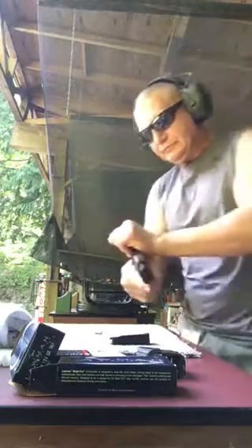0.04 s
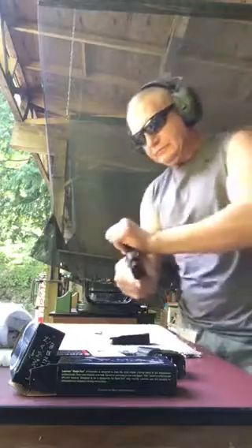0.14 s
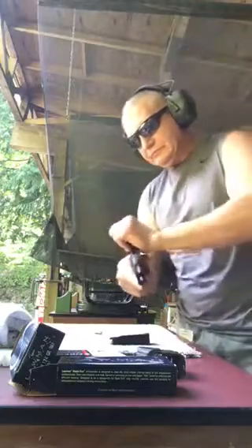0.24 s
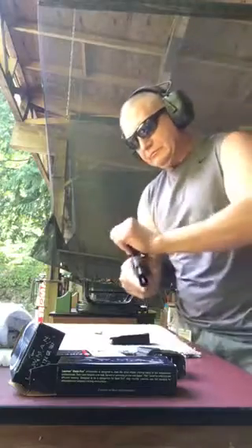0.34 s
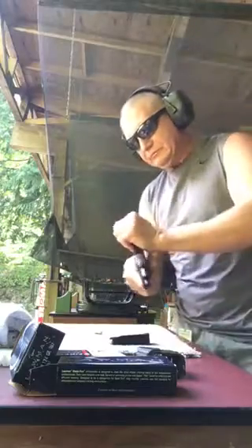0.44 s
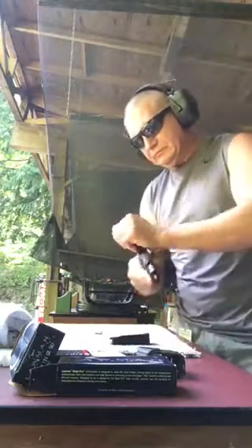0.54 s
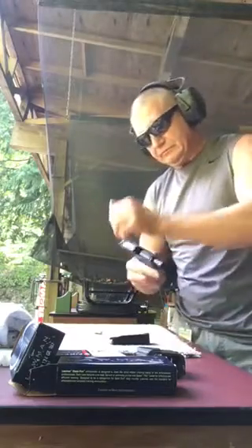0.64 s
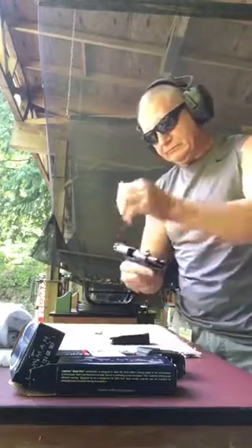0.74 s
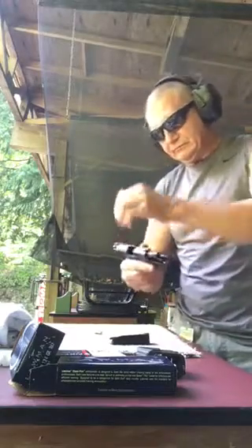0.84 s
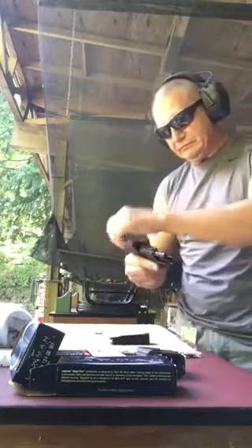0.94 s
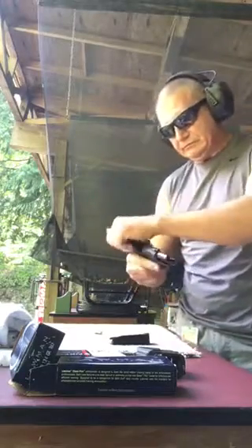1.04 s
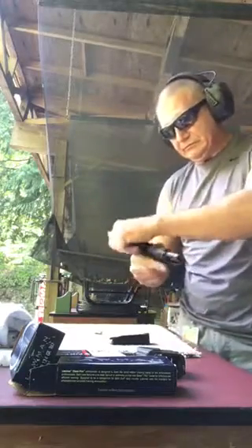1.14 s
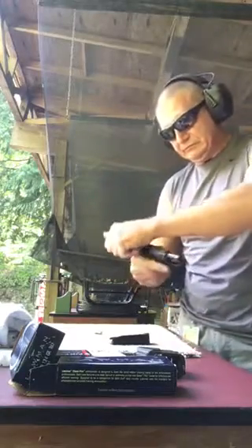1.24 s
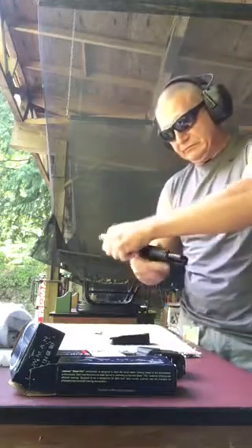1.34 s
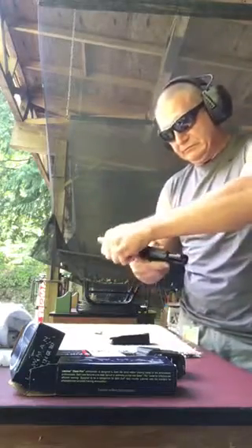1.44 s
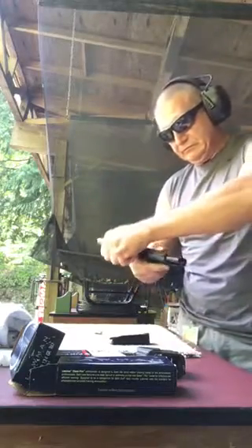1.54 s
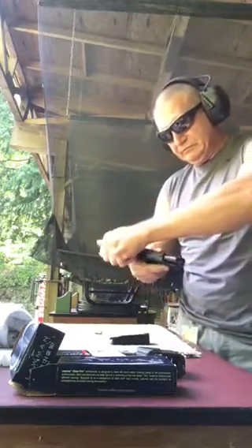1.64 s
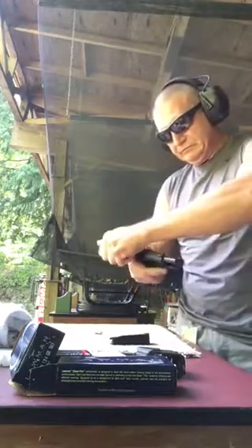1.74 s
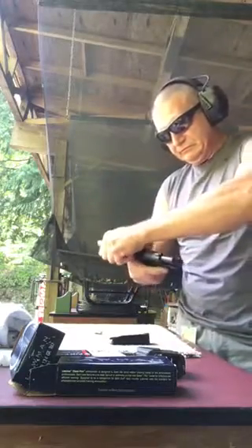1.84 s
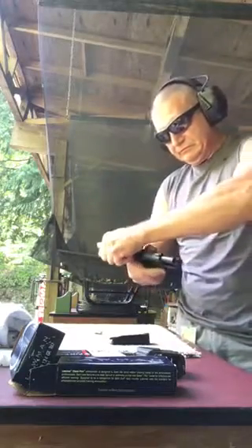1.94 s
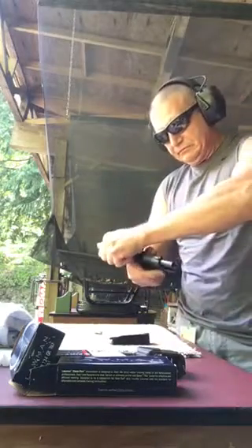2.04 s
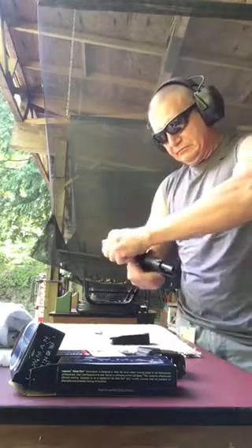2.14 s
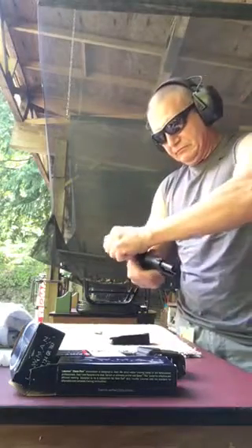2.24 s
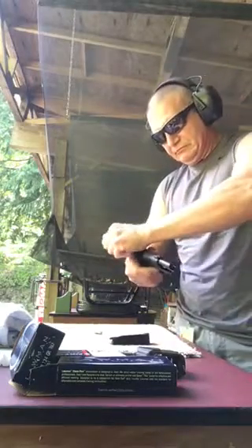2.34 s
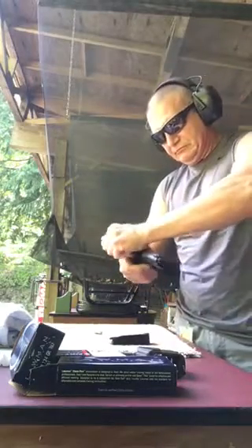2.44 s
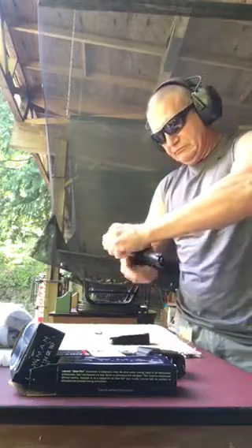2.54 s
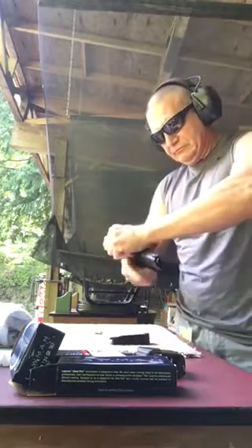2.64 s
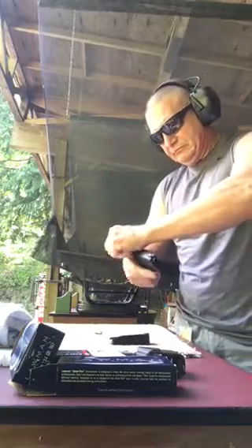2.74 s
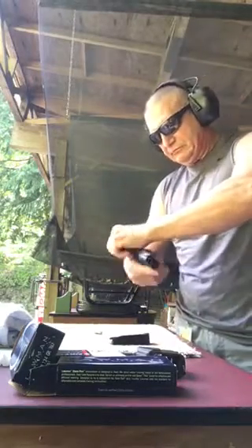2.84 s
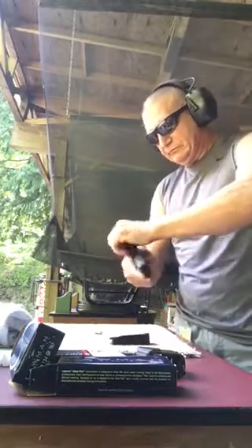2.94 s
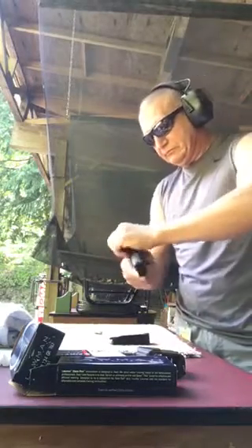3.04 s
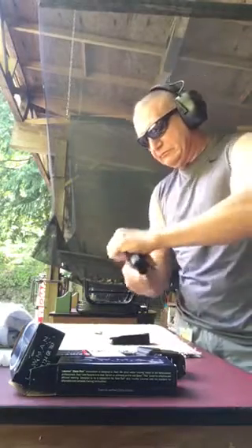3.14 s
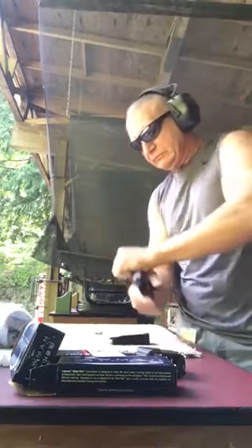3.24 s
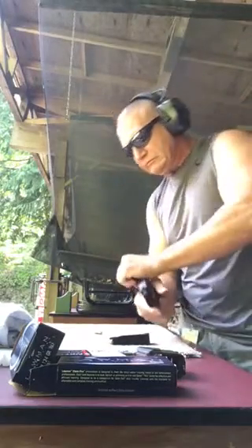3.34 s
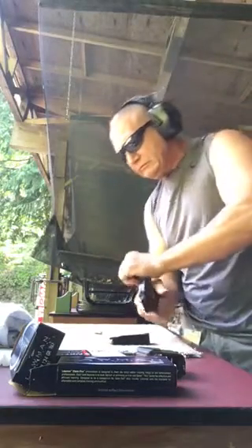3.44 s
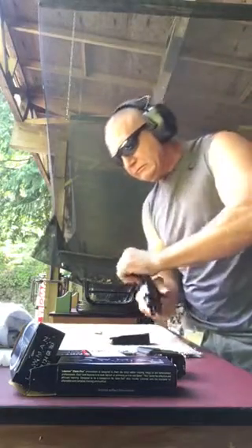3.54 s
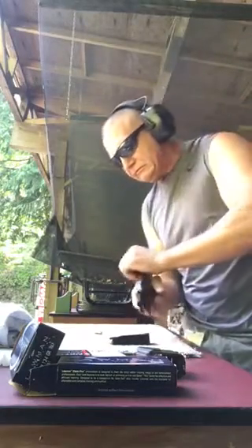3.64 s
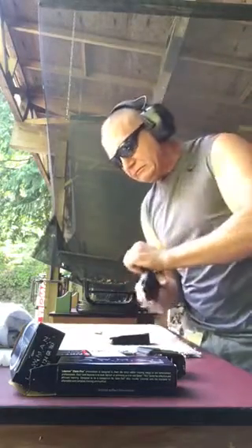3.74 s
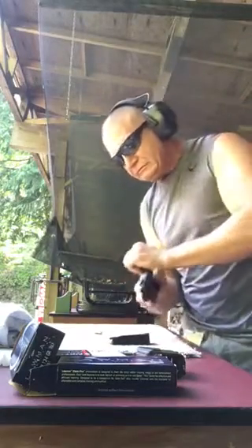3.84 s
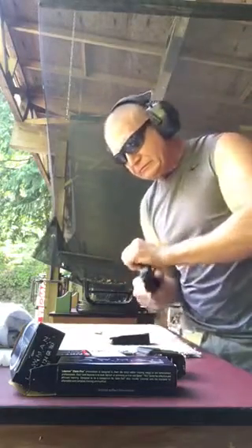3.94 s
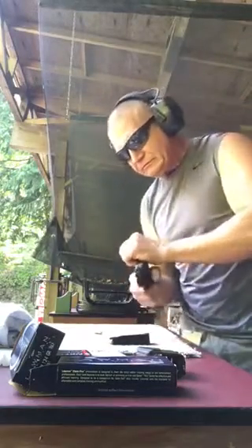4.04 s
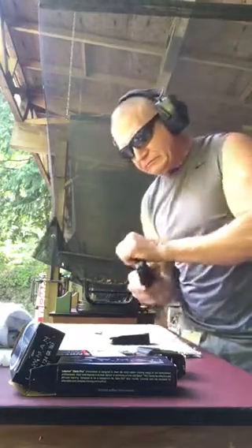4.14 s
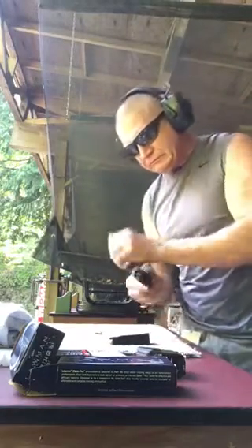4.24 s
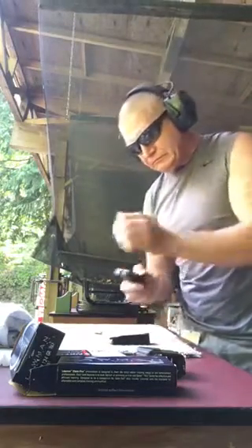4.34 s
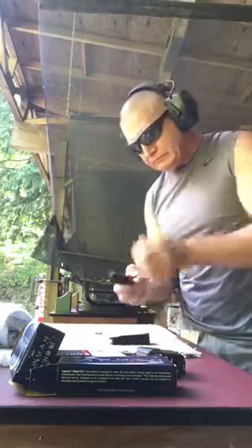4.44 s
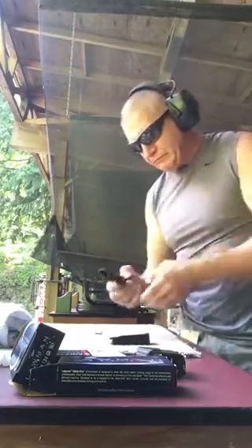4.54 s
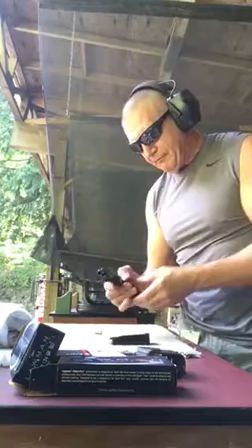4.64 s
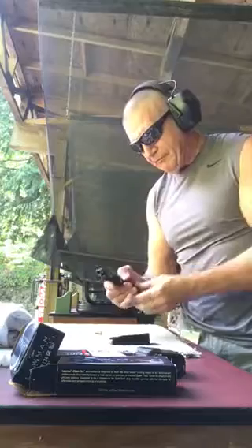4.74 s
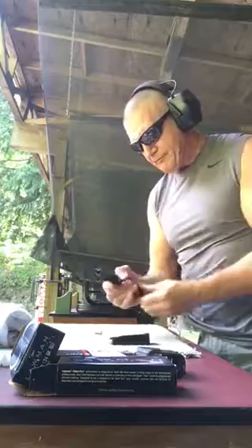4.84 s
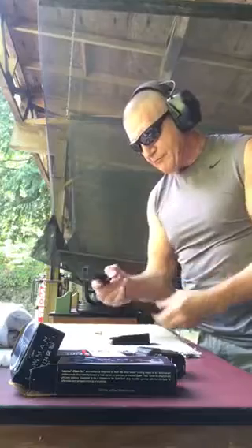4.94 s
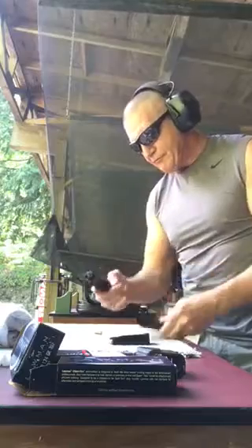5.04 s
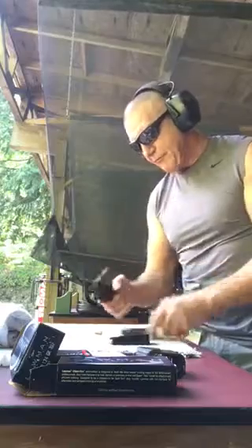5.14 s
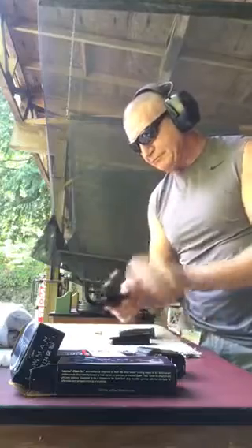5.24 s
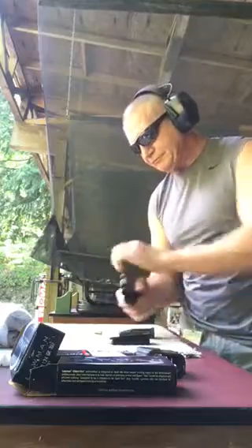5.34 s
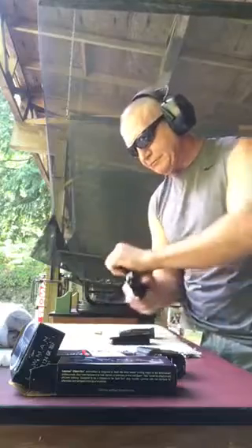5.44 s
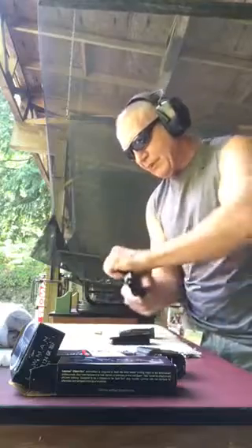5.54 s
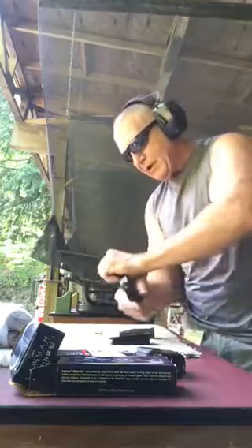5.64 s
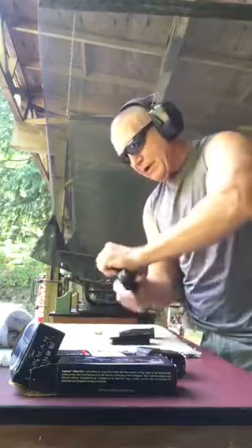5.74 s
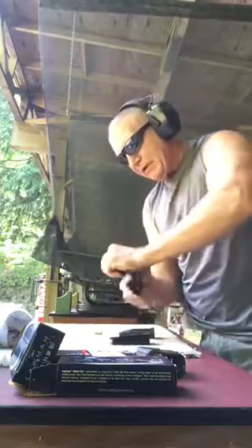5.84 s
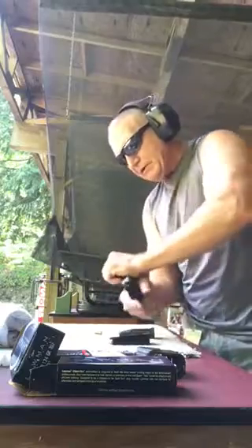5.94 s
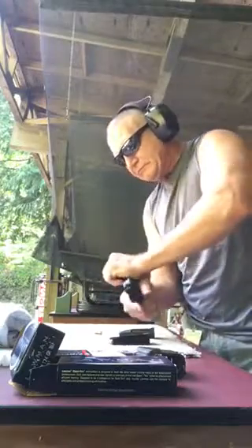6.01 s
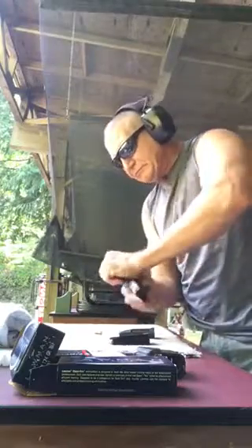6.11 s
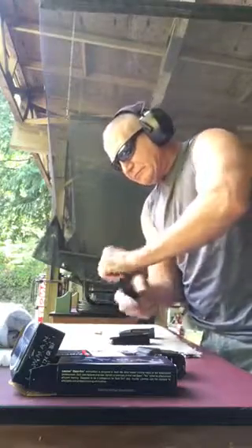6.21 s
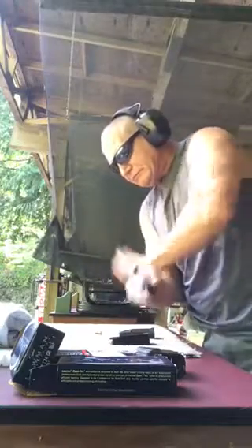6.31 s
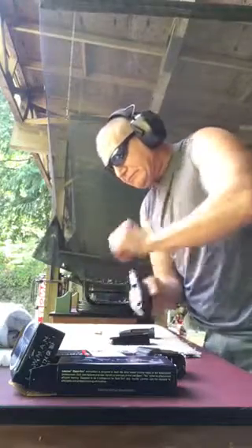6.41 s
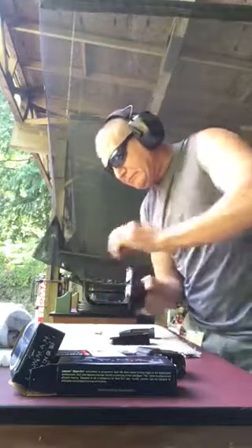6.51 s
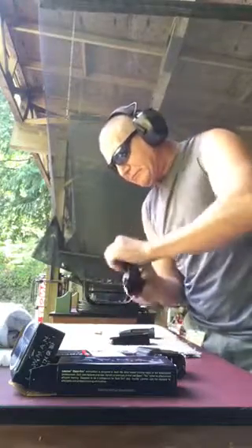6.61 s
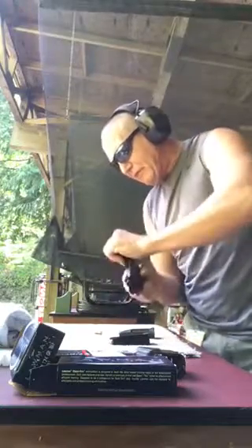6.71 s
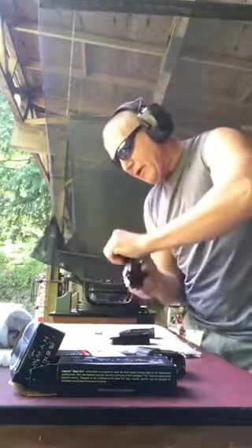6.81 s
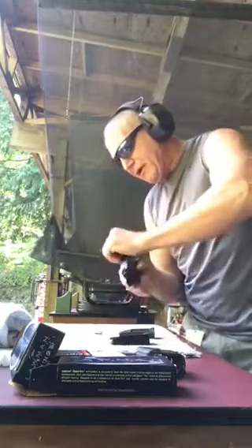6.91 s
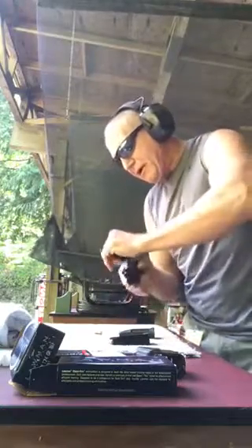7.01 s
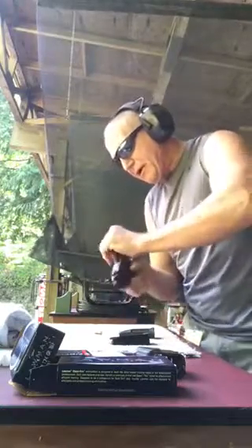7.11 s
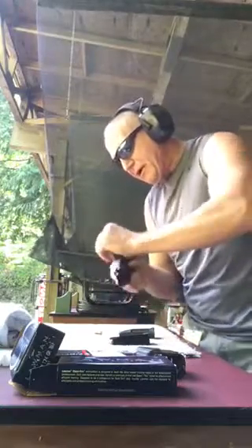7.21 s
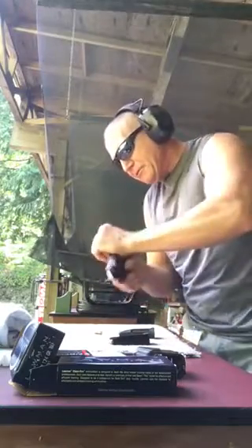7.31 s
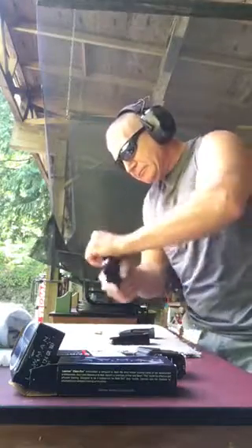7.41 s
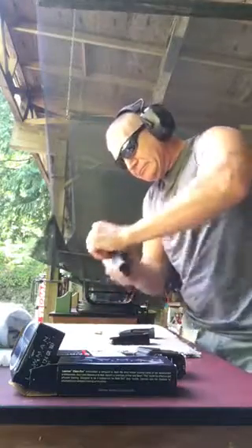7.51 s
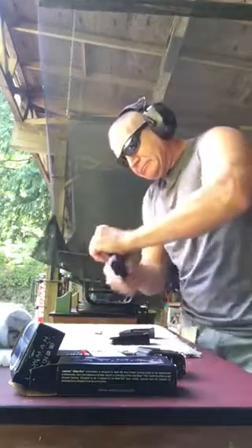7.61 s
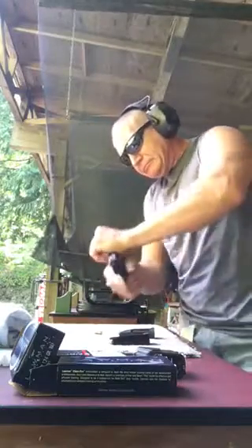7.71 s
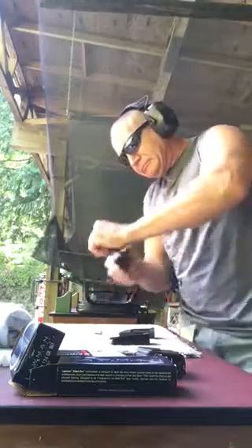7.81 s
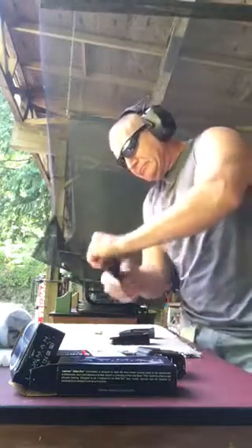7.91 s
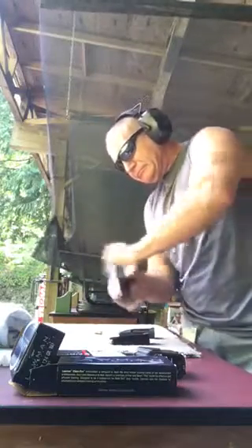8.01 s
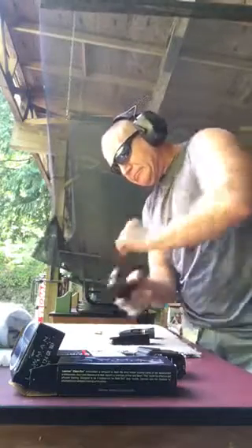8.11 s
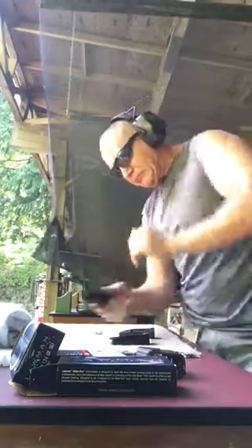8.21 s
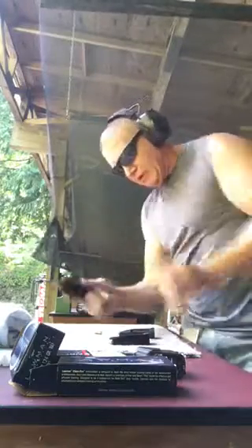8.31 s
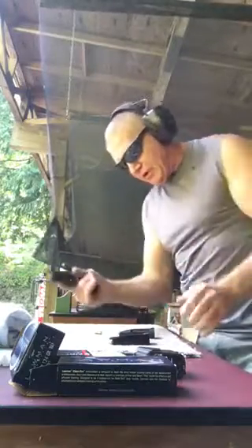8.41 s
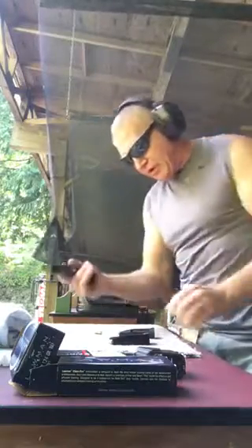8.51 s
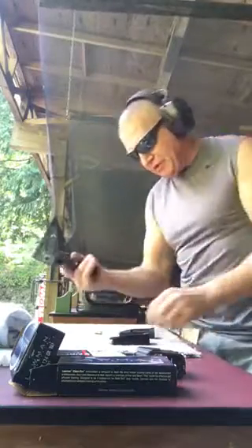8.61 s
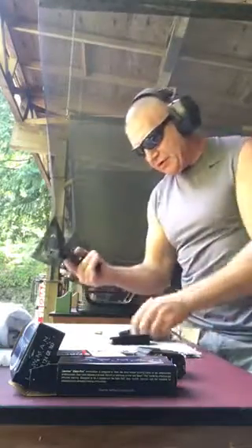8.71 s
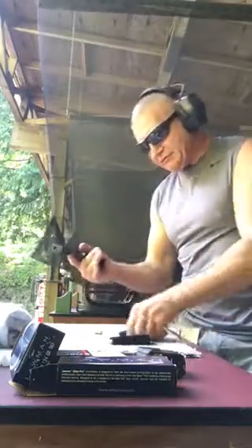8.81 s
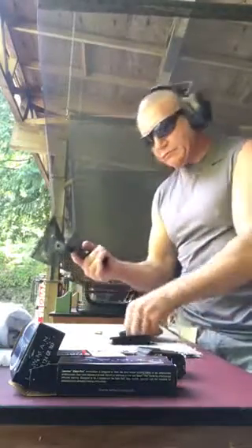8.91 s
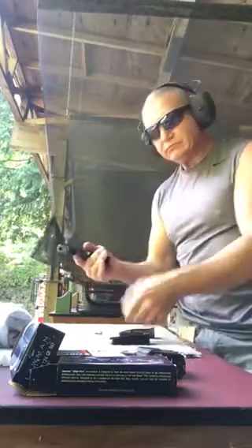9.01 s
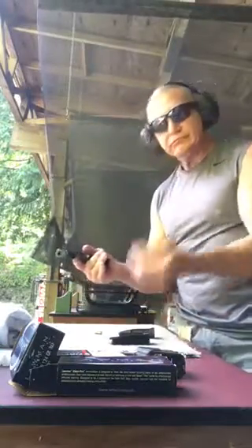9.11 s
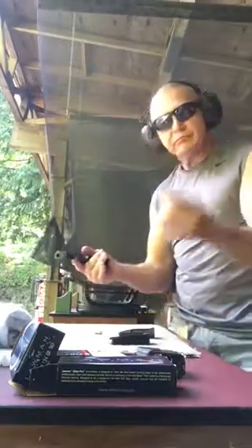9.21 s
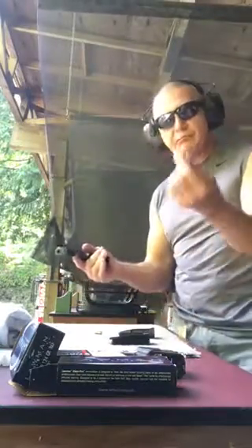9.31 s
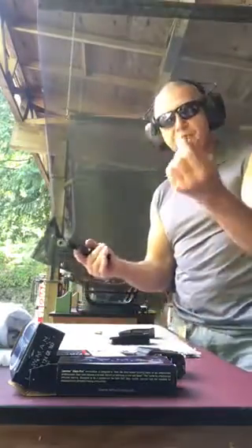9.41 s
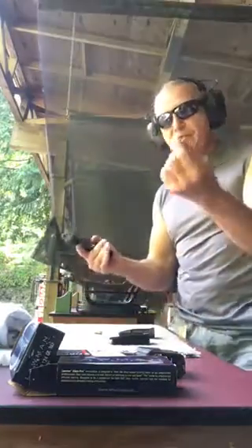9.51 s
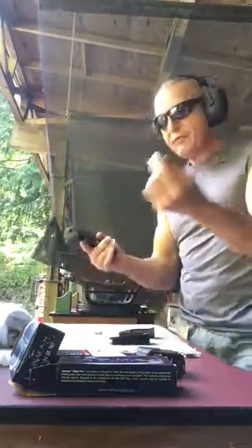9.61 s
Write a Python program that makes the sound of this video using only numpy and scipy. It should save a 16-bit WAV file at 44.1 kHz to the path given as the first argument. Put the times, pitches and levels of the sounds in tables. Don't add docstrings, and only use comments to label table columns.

```python
import sys
import numpy as np
from scipy import signal
from scipy.fft import rfft, irfft, next_fast_len
from scipy.io import wavfile
from scipy.ndimage import uniform_filter1d, map_coordinates

SR = 44100
rng = np.random.default_rng(int(sys.argv[2]) if len(sys.argv) > 2 else 0)


def volts(x):
    e = np.asarray(x, float) / 20
    return 10 ** e


def wav_record(signal):
    frames = np.transpose(np.atleast_2d(signal))
    bounded = np.clip(frames, -1, 1)
    quanta = np.round(bounded * 32767).astype(np.int16)
    wavfile.write(sys.argv[1], SR, quanta)


N = 426006


def unit(x):
    return x / np.sqrt(np.mean(x ** 2) + 1e-20)


def along(points, hz):
    f, v = np.transpose(points)
    return np.interp(np.log(hz + 1), np.log(f + 1), v)


def wobble(rate):
    knots = rng.standard_normal(int(N * rate / SR) + 4)
    return map_coordinates(knots, [np.arange(N) * rate / SR])


def coloured(x, spectrum):
    m = next_fast_len(len(x))
    gain = volts(along(spectrum, np.fft.rfftfreq(m, 1 / SR)))
    return unit(irfft(rfft(x, m) * gain, m)[:len(x)])


def dying(length, t60s, nper=256):
    hz, t, z = signal.stft(rng.standard_normal(length), SR, nperseg=nper)
    decay = volts(-60 * t / along(t60s, hz)[:, None])
    return signal.istft(z * decay, SR, nperseg=nper)[1][:length]


def add(track, s, x):
    part = track[max(round(s * SR), 0):][:len(x)]
    part += x[:len(part)]


def rough_tone(hz, width_hz, count):
    knots = rng.standard_normal((2, int(count * width_hz / SR) + 4))
    a, b = (map_coordinates(k, [np.arange(count) * width_hz / SR]) for k in knots)
    phase = 2 * np.pi * np.cumsum(np.broadcast_to(hz, count)) / SR
    return a * np.sin(phase) + b * np.cos(phase)


def ring(hz, width_hz, t60, wander):
    t = np.arange(round(min(t60, 1 / 3) * SR)) / SR
    blur_hz = 11 / t60 / (1.5 - wander)
    rough = rough_tone(hz, min(width_hz, blur_hz), len(t))
    steady = np.sqrt(abs(1 - wander ** 2)) * np.sin(2 * np.pi * hz * t)
    return (steady + wander * rough) * volts(-60 * t / t60)


# (frequency [Hz], t60 [s])
SHELTER_T60 = [(300, 0.32), (1500, 0.24), (5000, 0.23), (15000, 0.18)]


def tail():
    x = dying(SR // 5, SHELTER_T60)
    t = np.arange(len(x)) / SR
    roof_swell = 1 + 0.7 * np.exp(-((t - .0145) / 0.0018) ** 2)
    x *= np.clip(t / 0.0036, 0, 1) * roof_swell
    return x / np.linalg.norm(x)


def shelter(x, wet_db):
    wet = signal.fftconvolve(x, volts(wet_db) * tail())
    wet[:len(x)] += x
    return wet


# (time [s], level [dB])
PHONE_GAIN = [(0, 0.5), (1.4, -0.5), (3.3, -1.5), (4.4, 3), (5.4, 3.5), (6.1, -2), (6.8, 1), (7.35, -1),
              (7.7, -10), (8.4, -12), (8.65, -1), (9.2, 1.5), (9.66, -1)]


def phone_gain_db():
    s, db = np.transpose(PHONE_GAIN)
    return np.interp(np.arange(N) / SR, s, db, left=-120, right=-120)


# (frequency [Hz], level [dB per Hz])
RUMBLE_SPECTRUM = [(12, -39), (20, -17), (64, 3), (118, -3.5), (193, -9), (247, -7.5), (300, -20),
                   (390, -48.5), (660, -120)]


def rumble():
    level_db = -61.5 + phone_gain_db() + 0.89 * wobble(3.6)
    return volts(level_db) * coloured(rng.standard_normal(N), RUMBLE_SPECTRUM)


# (frequency [Hz], level [dB per Hz])
LEAF_SPECTRUM = [(170, -25), (300, -1.5), (600, -4), (900, -9), (1500, -13.5), (2600, -27.5)]


def leaves():
    level_db = -68.5 + 0.22 * phone_gain_db() + 1.7 * wobble(4.7)
    return volts(level_db) * coloured(rng.standard_normal(N), LEAF_SPECTRUM)


# (frequency [Hz], level [dB per Hz])
MIC_SPECTRUM = [(900, -26), (1800, -2.5), (3200, 1.5), (4900, -7), (6500, -3.5), (10400, -13.5),
                (13000, -11), (16500, -25)]


def microphone_hiss():
    return volts(-73.5 + 1.3 * wobble(9.6)) * coloured(rng.standard_normal(N), MIC_SPECTRUM)


def machine():
    shaft_hz, load_off_s = 40.7, 3.3
    t = np.arange(N) / SR
    duck_db = 1.8 * np.minimum(phone_gain_db(), 0)
    third_db = -56.5 - 1.17 * t - 2.5 * (t > load_off_s) + duck_db
    sixth_db = np.where(t < load_off_s, -66.5, -77) + duck_db
    turns = np.cumsum(shaft_hz * (1 + .008 * wobble(1.5))) / SR
    orders = [(2.1, third_db - 6), (3, third_db + 1.5), (4.1, third_db - 8.5), (5.95, sixth_db + 3)]
    return sum(volts(db + 2.2 * wobble(4.5)) * np.sin(2 * np.pi * k * turns) for k, db in orders)


# (middle [s], length [s], rustle [dB], hollow [dB])
RUBS = [(.0, 0.13, -62, -67), (0.104, 0.15, -64, -56.5), (0.495, 0.11, -70.5, -76),
        (0.662, 0.087, -68, -70.5), (0.736, 0.11, -64, -61), (0.82, 0.13, -70.5, -73),
        (1.013, .1, -68, -86), (1.147, 0.069, -59, -72), (1.308, 0.07, -69, -69), (1.366, 0.16, -74, -85),
        (4.23, 0.12, -61.5, -73), (4.315, 0.036, -66, -82), (4.515, 0.1, -66.5, -62),
        (4.703, 0.064, -69, -66.5), (4.777, 0.0697, -69, -74), (4.946, 0.17, -53.5, -52),
        (4.978, 0.05, -53, -45), (5.065, 0.19, -65.5, -61), (5.223, 0.1, -67, -64),
        (5.532, 0.033, -68, -70), (6.294, 0.086, -30.5, -39.5)]
# (frequency [Hz], level [dB per Hz])
SKIN_SPECTRUM = [(1290, -23.5), (2200, -9.5), (3240, -2), (11900, -10.5), (14800, -16.5), (16100, -26.5),
                 (16500, -47.5)]
# (frequency [Hz], level [dB per Hz])
GRIP_SPECTRUM = [(900, -46.5), (1400, -11.5), (1800, 1), (2200, -10), (2900, -36)]


def hands():
    t, grain = np.arange(N) / SR, volts(3.9 * wobble(140))
    rustle = coloured(rng.standard_normal(N) * grain, SKIN_SPECTRUM)
    hollow = coloured(rng.standard_normal(N) * grain, GRIP_SPECTRUM)
    out = np.zeros(N)
    for s, length, rustle_db, hollow_db in RUBS:
        swell = np.cos(np.pi * np.clip((t - s) / length, -.5, .5)) ** 2
        out += swell * (volts(rustle_db) * rustle + volts(hollow_db) * hollow)
    return out


def strike_rise(t):
    return 1 - np.exp(-t / 0.00011)


# (time [s], level [dB], frequency [Hz])
PALM_KNOCKS = [(0.058, -48, 610), (0.0891, -38.5, 910), (0.205, -26.5, 800), (.261, -35.5, 560),
               (.29, -41, 300), (2.4645, -23.5, 770), (2.655, -48, 720), (2.945, -49.5, 894),
               (3.279, -25, 776), (3.283, -32, 563), (5.667, -31, 390), (6.009, -30.5, 380),
               (6.16, -33, 349.5), (6.271, -38.5, 350), (6.327, -24, 362), (7.435, -36.5, 361),
               (7.557, -24, 520), (7.83, -28, 400), (8.068, -34.5, 400), (8.073, -23, 299.6),
               (8.077, -22.5, 548), (8.085, -8.5, 660)]


def knocks():
    out, t = np.zeros(N), np.arange(SR // 25) / SR
    for s, db, hz in PALM_KNOCKS:
        body = np.sin(2 * np.pi * hz * t) + 0.49 * rough_tone(hz * 1.2, 300, len(t))
        knock = volts(db - 60 * t / 0.021) * strike_rise(t) * body
        high_pass = signal.butter(2, 0.6 * hz, "high", fs=SR)
        add(out, s, signal.lfilter(*high_pass, knock))
    return out


# (time [s], peak level [dB], frequency [Hz])
TAPS = [(0.081, -36.5, 1370), (0.6536, -52, 3320), (0.717, -43, 1780), (0.955, -44, 3300),
        (0.9612, -41, 4570), (1.0612, -42, 4300), (8.908, -62, 4505), (1.1477, -49, 7030),
        (1.81, -53, 3300), (1.812, -59, 8000), (1.307, -53, 1750), (1.309, -56, 3300), (1.31, -58, 6100),
        (2.599, -49, 1730), (2.837, -40, 1150), (2.9455, -50, 2050), (3.162, -57.5, 1730),
        (3.2273, -42, 3300), (5.2305, -44.5, 2900), (5.545, -53.5, 1430), (5.5918, -55, 1730),
        (5.6079, -37, 1550), (5.6156, -37, 4260), (6.763, -50, 2840), (6.8395, -52, 3180),
        (6.844, -53.5, 7800), (7.02, -47, 3650), (7.1388, -59, 1706), (7.1834, -55, 1460),
        (7.2112, -42, 3560), (7.396, -39, 1324), (8.8784, -52, 3170)]


def ticks():
    out, t = np.zeros(N), np.arange(SR // 25) / SR
    for s, db, hz in TAPS:
        t60_ms = 18 * (1000 / hz) ** 0.29
        tone = strike_rise(t) * volts(-60 * t * 1000 / t60_ms) * np.sin(2 * np.pi * hz * t)
        tip_spectrum = [(hz / 2.0, -20), (hz, 0), (hz * 2.2, -14), (hz * 6, -32)]
        tip = 0.29 * volts(-60 * t / 0.0067) * coloured(rng.standard_normal(len(t)), tip_spectrum)
        add(out, s, volts(db + 0.8) * shelter(tone + tip, wet_db=-13.5))
    return out


# (time [s], peak level [dB], frame ring [Hz], ring [dB], brightness [dB])
SLIDE_STOPS = [(0.2045, -19, 1640, -8, -8.5), (0.2066, -18, 1500, -8, -8.5),
               (2.4649, -12.5, 1036, -12, -10), (3.279, -3, 1606, -11, -5.5), (3.4961, -6, 1192, -9, -6),
               (5.6422, -12.5, 1710, -7.5, 1), (5.6672, -14, 1550, -7, -10.5),
               (5.8285, -10.5, 1160, -15, -8.5), (5.8352, -6, 1136, -8, 0.5), (6.011, -4.5, 1396, -8, -7),
               (6.1526, -8, 1206, -16, -6), (6.1576, -7, 1190, -7.5, -0.5), (6.2719, -3.5, 1410, -4, -5),
               (6.3271, -5, 1344, -5, -5.5), (7.4365, -2, 1284, -14.5, -5.5), (7.5562, -3, 1700, -16, -3),
               (7.56, -3, 1600, -16, -3), (7.7228, -3.5, 1780, -13, -5.5), (7.8262, -2.5, 1625, -17, -2.5),
               (7.8305, -4.5, 1480, -14.5, -4), (7.9813, -2.5, 1430, -11.5, -5.5),
               (8.084, -1, 1160, -20, -3)]
# (time [s], peak level [dB], frame ring [Hz], ring [dB])
CATCH_TOUCHES = [(5.6609, -17.5, 1568, -11), (5.671, -18.5, 1756, -18), (5.807, -33, 1460, -20),
                 (5.8231, -22.5, 1212, -10), (5.966, -17, 1433, -11), (5.9704, -22.5, 1800, -6),
                 (6.148, -26, 1400, 2.5), (6.2408, -15.5, 1362, -9), (7.4068, -23.5, 1350, -18.5),
                 (7.4164, -15, 1357, -16), (7.4896, -18.5, 1384, -5), (7.4968, -20.5, 1473, -16.5),
                 (7.5138, -17.5, 1576, -12), (7.5515, -16, 1450, -11.5), (7.774, -23.5, 1400, -14.5),
                 (8.043, -26, 1503, -20), (7.5239, -14, 1313, -12.5), (7.6898, -19.5, 1334, -8.5),
                 (7.697, -17, 1350, -13), (7.8215, -15.5, 1137, -15), (7.9472, -17, 1695, -21),
                 (7.9545, -16.5, 1710, -14)]
# (time [s],
# peak level [dB], ring [dB])
LOOSE_RATTLES = [(0.2186, -22, -21), (0.2224, -21, -25), (0.9624, -36, -9), (2.471, -20, -15),
                 (2.483, -19.5, -38), (2.4888, -20.5, -11), (2.513, -23.5, -7), (2.52, -20.5, -29),
                 (2.6554, -30, -40), (2.8172, -30.5, -27), (2.8437, -27.5, -24.5), (3.2356, -20.5, -15),
                 (3.312, -19.5, -21.5), (4.9995, -32, -23), (5.2309, -42.5, -15), (6.079, -30.5, -29.5),
                 (3.5255, -26.5, -31), (6.126, -37.5, -31), (6.133, -32, -31.5), (6.29, -19, -15),
                 (6.297, -19, -15), (7.411, -27.5, -19), (7.4244, -17.5, -27), (7.46, -18, -19.5),
                 (7.845, -20, -18), (8.005, -20.5, -20), (8.012, -23, -19), (8.108, -20.5, -31.5),
                 (8.14, -29.5, -29), (8.258, -29, -30.5), (7.62, -29.5, -12), (7.652, -34, -10),
                 (7.738, -18.5, -25), (7.966, -24.5, -14.5), (7.993, -18.5, -19.5), (7.575, -16.5, -25),
                 (6.284, -16, -20.5), (2.468, -21, -17), (2.481, -22.5, -25)]
# (time [s], peak level [dB], frame ring [Hz], ring [dB])
MUFFLED_CONTACTS = [
    (0.09, -47, 1740, 17),
    (0.2624, -33, 1170, -6),
    (1.06, -35, 1700, -5),
    (2.8237, -29.5, 1330, -40),
    (4.9538, -29, 1770, 17.5),
    (4.9743, -38, 1920, 13),
    (4.9901, -36, 1880, 8),
]


def contacts():
    catch_bright_db, rattle_bright_db, muffled_bright_db = -5, -6, -24
    rattle_hz = 1780
    rows = list(SLIDE_STOPS)
    rows += [(*row, catch_bright_db) for row in CATCH_TOUCHES]
    rows += [(*row, muffled_bright_db) for row in MUFFLED_CONTACTS]
    rows += [(s, db, rattle_hz, ring_db, rattle_bright_db) for s, db, ring_db in LOOSE_RATTLES]
    return [(*row, 5.34 + 0.22 * row[1]) for row in rows]


# (frequency [Hz], level [dB per Hz])
RAIL_SPECTRUM = [(290, -44), (500, -23.5), (952, -13.5), (1130, -11), (1480, -8.5), (3600, -2.5),
                 (4970, -13), (9190, -9), (15100, -22), (16500, -33)]


def rail_rub(noise):
    return coloured(noise, RAIL_SPECTRUM)


def chatter_burst(t, tilt, chatter_ms):
    chatter = np.exp(.4 * np.repeat(rng.standard_normal(len(t) // 20 + 1), 20)[:len(t)])
    shape = np.exp(-(t * 1000 / max(chatter_ms, 1.5)) ** 2) * (1 - np.exp(-(t / .0007) ** 2))
    crack = coloured(rng.standard_normal(len(t)), tilt) * chatter * shape
    return crack / np.abs(crack).max()


def frame_ring(t, hz, db):
    struck = volts(-60 * t / 0.018) * np.sin(2 * np.pi * hz * t)
    linger = volts(0.43 * db - 24 - 60 * t / 0.17) * rough_tone(hz, 60, len(t))
    return (struck + linger) * (1 - np.exp(-t / 0.00043))


# (frequency [Hz], level [dB])
STEEL_MODES = [(2850, -11.5), (3350, 3), (4100, -4), (4650, -24), (5100, -22), (5900, -8), (6650, -4),
               (7500, -3.5), (9100, -9.5), (10700, -4), (12100, -18)]
# (frequency [Hz], level [dB per Hz])
CRACK_SPECTRUM = [(150, -48.5), (250, -13.5), (838, -17), (1440, -0.5), (2320, -8.5), (4430, -2),
                  (8780, -7), (10800, -6.5), (11600, -6.5), (15100, -12), (16500, -35)]


def clicks():
    out, t = np.zeros(N), np.arange(SR // 5) / SR
    hz, level = np.transpose(STEEL_MODES)[:, :, None]
    for s, db, ring_hz, ring_db, bright_db, chatter_ms in contacts():
        tilt = [(f, g + 1.4 * (bright_db + 5.5) * np.clip(np.log2(f / 4000), 0, 1.2))
                for f, g in CRACK_SPECTRUM]
        crack = chatter_burst(t, tilt, chatter_ms)

        luck = rng.standard_normal((3, len(hz), 1))
        mode_db = level + 2.5 * luck[0] + along(tilt, hz) - along(CRACK_SPECTRUM, hz)
        mode_phase = 2 * np.pi * hz * (1 + .02 * luck[1]) * t + 3 * luck[2]
        modes = volts(mode_db - 60 * t / .022) * np.sin(mode_phase)
        frame = volts(ring_db - 0.5) * frame_ring(t, ring_hz, db)
        hit = crack + shelter(frame + volts(-18.5) * modes.sum(0), wet_db=-13)[:len(t)]
        add(out, s - .0004, volts(db - 0.5) * hit)
        add(out, s + .0128, volts(db - 18) * hit)

        spread = coloured(tail(), tilt)
        add(out, s, volts(db - 8.0) * np.linalg.norm(crack) * spread / np.linalg.norm(spread))

        lead = volts(-27 - 60 * t[900::-1] / .05) * rail_rub(rng.standard_normal(901))
        add(out, s - 900 / SR, volts(2.4 * db) * lead)
    return out


# (time [s], level [dB],
# frequency [Hz], t60 [s])
LOOSE_PINGS = [(2.52, -44.5, 10600, 0.099), (2.657, -48, 3030, 0.11), (2.846, -51, 3470, 0.12),
               (3.236, -46, 10600, .04), (3.266, -38, 4600, .015), (3.28, -15.5, 4000, .018),
               (3.282, -24, 10750, .03), (3.29, -45.5, 10600, .25), (3.295, -43, 3500, .2),
               (3.497, -13, 10600, .025), (3.51, -39.5, 10700, 0.092), (3.497, -22.5, 8900, .02),
               (5.642, -14, 9740, .012), (5.661, -28, 10570, .03), (5.671, -32, 10600, 0.07),
               (5.835, -10, 9150, 0.016), (5.836, -40.5, 9140, .25), (5.84, -42, 3500, .2),
               (6.013, -18, 4700, .015), (6.025, -38, 4380, .15), (6.158, -17, 9200, .02),
               (6.272, -17, 4520, .02), (6.272, -17, 7520, .02), (6.327, -14, 6200, .02),
               (6.327, -16, 5200, .015), (6.34, -22.5, 6450, .02), (7.417, -24, 4200, .014),
               (7.524, -30, 9400, .012), (7.557, -18.5, 4450, .02), (7.569, -20, 6500, .02),
               (7.698, -30, 10800, 0.019), (7.723, -17, 6270, .012), (7.83, -13.5, 3340, .02),
               (7.828, -21, 6726, .02), (7.839, -23.5, 7700, .02), (7.982, -19.5, 3180, .015),
               (7.995, -27.5, 10600, .015), (8.003, -33, 3120, .06), (7.437, -17.5, 4420, 0.029),
               (7.437, -29.5, 10640, .13), (7.55, -22.5, 2600, .008), (8.097, -11, 6370, 0.02),
               (8.098, -25, 10600, 0.043), (8.11, -39.5, 6550, .3),
               (8.2575, -42, 2300, .008), (6.011, -16, 5500, .012), (5.6675, -24, 2100, .015),
                (0.206, -26, 2900, .012), (0.23, -46, 3300, .2), (8.259, -42, 6900, .015),
                (8.27, -53, 5200, .08), (2.53, -50, 3050, 0.14), (2.471, -28, 5100, 0.018),
                (2.465, -25, 3230, .015), (8.257, -41, 3050, 0.2)]


def pings():
    out = np.zeros(N)
    for s, db, hz, t60 in LOOSE_PINGS:
        x = ring(hz, 300, t60, wander=0.75)
        add(out, s, volts(db - 0.5) * strike_rise(np.arange(len(x)) / SR) * x)
    return out


# (time of top speed [s], level [dB], frame ring [Hz])
SLIDE_STROKES = [(.3, -61.5, 1281), (2.819, -58.5, 1300), (3.3, -55, 1620), (3.411, -60.5, 1582),
                 (5.815, -45, 1449), (5.91, -55.5, 1200), (6.04, -50.5, 1430), (6.19, -43.5, 1159),
                 (6.259, -45.5, 1200), (6.36, -48, 1370), (7.471, -53, 1350), (7.58, -37.5, 1601),
                 (7.745, -35, 1473), (7.86, -39.5, 1490), (7.961, -47.5, 1502), (8.03, -39.5, 1498),
                 (8.13, -45.5, 1252)]


def scrape():
    speed_up_db_per_s, slow_db_per_s = 218, 151.5
    t, level = np.arange(N) / SR, np.zeros(N)
    for s, db, _ in SLIDE_STROKES:
        level += volts(db - 1.5 - np.maximum(speed_up_db_per_s * (s - t), slow_db_per_s * (t - s)))
    clumps = volts(5 * wobble(300) + 2.5 * wobble(40))
    grains = rail_rub(rng.standard_normal(N) * clumps)
    s, _, ring_hz = np.transpose(SLIDE_STROKES)
    hum = rough_tone(np.interp(t, s, ring_hz), 70, N)
    return level * (grains + volts(-13.0) * hum)


# (from [s], to [s], hiss level [dB])
RELEASES = [
    (3.251, 3.91, -60.5),
    (5.64, 6.745, -60.5),
    (7.415, 8.738, -63),
]
# (frequency [Hz], level [dB per Hz])
AIR_SPECTRUM = [(180, -35), (300, -6.5), (577, -2), (3360, -9), (4850, -9.5), (9020, -11), (14200, -21),
                (15700, -16), (16500, -40.5)]


def released_hiss():
    t = np.arange(N) / SR
    gate = sum(volts(db) * (t > a) * np.clip((b - t) / 0.0094, 0, 1) for a, b, db in RELEASES)
    return gate * coloured(rng.standard_normal(N), AIR_SPECTRUM)


# (frequency [Hz], level [dB per Hz])
SHOT_SPECTRUM = [(24, -35.5), (45, -6.5), (130, -14.5), (280, -7.5), (480, -2.5), (750, 0.5), (1150, -5.5),
                 (1800, -8.5), (3500, -16), (7200, -31), (14000, -54)]
# (frequency [Hz], t60 [s])
WOODS_T60 = [(60, 0.98), (250, 3.1), (700, 3.3), (1800, 2.04), (3500, 1.6), (6000, 0.69), (12000, 0.52)]
# (time [s], level over the roll [dB])
TREE_LINES = [
    (3.57, 1.5),
    (3.66, 0.8),
    (3.8, -0.6),
    (3.95, -1.2),
    (4.1, -1.2),
    (4.3, -1.2),
    (4.55, 0),
]


def far_shot():
    shot_s, shot_db = 3.457, -31.5
    out, t = np.zeros(N), np.arange(3 * SR) / SR
    z = signal.stft(dying(len(t), WOODS_T60, 512), nperseg=512)[2]
    patches = uniform_filter1d(rng.standard_normal(z.shape), 4, 0)
    patches = unit(uniform_filter1d(patches, 8, 1))
    echo = signal.istft(z * volts(1.1 * patches), nperseg=512)[1][:len(t)]
    echo = echo * (1 - np.exp(-(t / 0.009) ** 2))
    peals_db = sum(db * np.exp(-((t + shot_s - s) / 0.04) ** 2) for s, db in TREE_LINES)
    roll = coloured(echo, SHOT_SPECTRUM) * volts(peals_db)
    add(out, shot_s, volts(shot_db) * roll / np.std(roll[SR // 20:SR // 8]))
    return out * volts(0.43 * wobble(30) + 0.63 * wobble(9.0))


# (time [s], peak level [dB])
LOW_THUMPS = [
    (3.472, -32.5),
    (6.276, -44.5),
    (7.436, -43.5),
    (7.558, -21.5),
    (7.72, -40.5),
    (7.828, -26),
    (7.982, -36),
    (8.087, 1.5),
    (8.724, -34.5),
]


def jolts():
    out, t = np.zeros(N), np.arange(SR // 8) / SR
    cycles = 46 * t + 1.1 * (1 - np.exp(-t / 0.0043))
    swing = np.sin(2 * np.pi * cycles) * np.exp(-(t / 0.02) ** 1.6) * (1 - np.exp(-t / 0.0015))
    for s, db in LOW_THUMPS:
        add(out, s, volts(db - 5.0) * swing)
    return out


# (time [s], level [dB], frequency [Hz], t60 [s])
FRAME_TAPS = [(5.834, -14.5, 1740, 0.035), (5.845, -31.5, 1148, 0.32), (6.02, -29.5, 1370, .3),
              (6.142, -23, 1400, .04), (6.165, -31, 1154, .7), (6.28, -25, 1410, 0.14),
              (6.335, -26, 1387, .16), (6.304, -26.5, 1350, .03), (6.308, -23, 601, .03),
              (7.4375, -10, 1338, .05), (7.45, -30.5, 1340, .12), (7.467, -23.5, 1300, .03),
              (7.622, -29, 1200, .03), (7.689, -24, 1160, .03), (8.003, -18.5, 1500, .03),
              (8.012, -20, 1510, .03), (7.956, -24, 1680, .04), (6.045, -31, 1510, .08),
              (5.87, -37, 1800, .1), (6.42, -46, 1355, .2), (7.49, -18.5, 1420, .04),
              (7.502, -21.5, 1510, .04), (7.514, -24.5, 1450, .04), (7.525, -25.5, 1330, .05),
              (7.537, -24, 1380, .06), (7.552, -22, 1430, .03), (7.724, -18, 1550, .04),
              (7.771, -29, 1400, .06), (7.809, -19, 1400, .04), (7.817, -17, 1640, .03),
              (7.982, -9.5, 1475, .04), (8, -28.5, 1500, .12), (8.029, -29, 1500, .12),
              (8.085, -17.5, 1120, .03)]


def frame_taps():
    out = np.zeros(N)
    for s, db, hz, t60 in FRAME_TAPS:
        x = ring(hz, 110, t60, wander=0.55)
        rise = 1 - np.exp(-np.arange(len(x)) / SR / 0.00066)
        add(out, s, volts(db - 7.5) * rise * x)
    return out


# (time [s], level [dB], frequency [Hz], t60 [s])
FAR_CHIRRS = [
    (9.09, -70, 2590, 2.2),
    (9.335, -70.5, 3300, .3),
    (9.337, -65.5, 2160, .3),
    (9.337, -70, 7000, .15),
    (9.337, -71, 6300, .15),
    (9.53, -70.5, 2500, 0.16),
    (9.175, -64.5, 5260, .03),
    (9.337, -60, 2610, 0.2),
]


def chirrs():
    out, t = np.zeros(N), np.arange(SR // 3) / SR
    for s, db, hz, t60 in FAR_CHIRRS:
        add(out, s, volts(db - 60 * t / t60) * strike_rise(t) * rough_tone(hz, 300, len(t)))
    return out


def scene():
    surroundings = rumble() + leaves() + microphone_hiss() + released_hiss() + machine()
    handling = hands() + knocks() + ticks() + pings() + frame_taps()
    slide = clicks() + scrape() + jolts()
    return (surroundings + handling + slide + far_shot() + chirrs())[None]


def band_limit(x):
    return signal.sosfilt(signal.butter(12, 16980, fs=SR, output="sos"), x)


def record(dry):
    held = dry / (1 + np.abs(dry / 0.58) ** 6) ** (1 / 6)
    in_band = np.fft.rfftfreq(N, 1 / SR) < 16200
    mix = irfft(rfft(held) * in_band, N)
    return band_limit(mix)


dry = scene()
out = record(dry)
wav_record(out)
```